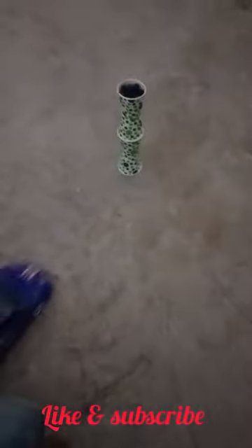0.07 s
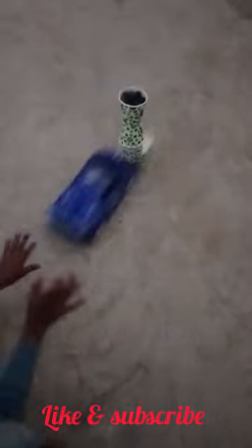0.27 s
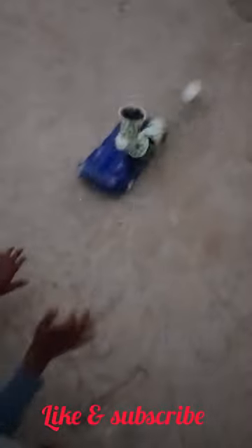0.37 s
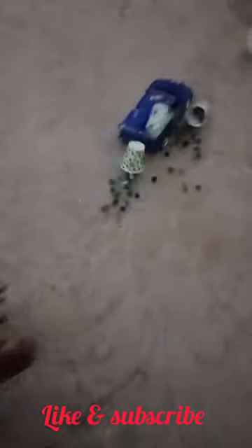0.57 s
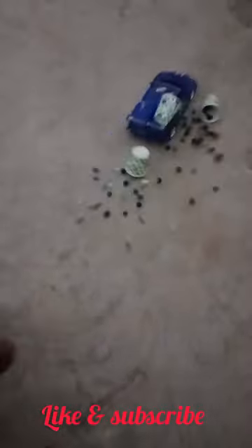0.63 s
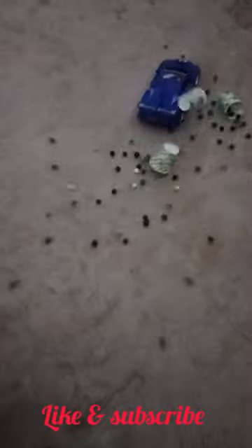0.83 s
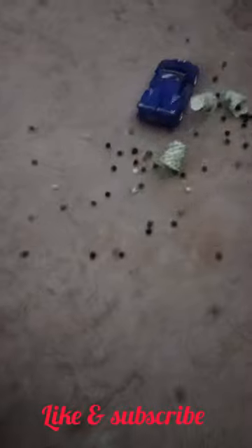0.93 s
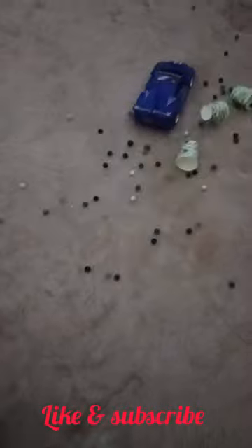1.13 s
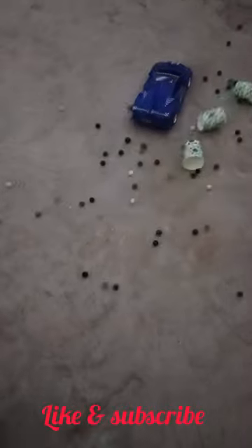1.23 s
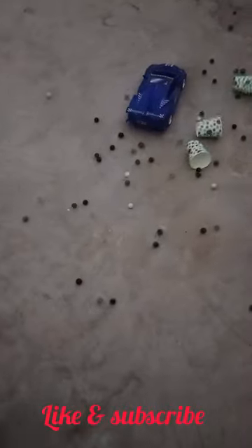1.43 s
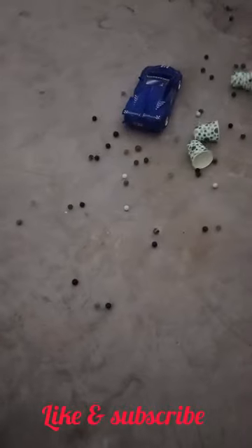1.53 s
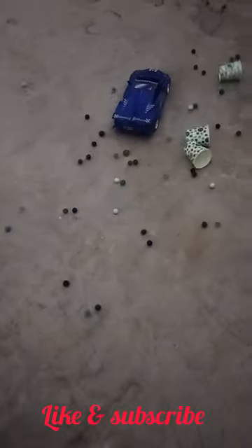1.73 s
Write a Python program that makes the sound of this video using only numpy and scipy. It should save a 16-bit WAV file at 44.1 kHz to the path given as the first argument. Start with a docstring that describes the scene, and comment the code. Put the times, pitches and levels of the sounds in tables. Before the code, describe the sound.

Crunching crash of a plastic toy car toppling paper cups, then marbles clicking and rolling apart.

```python
"""Toy car and cups of marbles

A plastic toy car, shoved across a hard floor, rams a stack of paper cups filled with marbles.
Bumps excite the modes of its shell, and the crash is a dense train of impacts. The cups tumble and
bounce with hollow pops as their walls and enclosed air resonate. The marbles pour over the car, then
click and roll apart. A phone above the floor hears it in a bare room."""
import sys
import numpy as np
from scipy import signal
from scipy.fft import rfft, irfft, next_fast_len
from scipy.io import wavfile
from scipy.ndimage import uniform_filter1d

SR = 44100
rng = np.random.default_rng(int(sys.argv[2]) if len(sys.argv) > 2 else 0)


def put_to_file(sound):
    """Save the sound as 16-bit audio at rate SR, in the file named by the first command-line argument."""
    columns = np.atleast_2d(sound).T  # one column per channel
    safe = np.clip(columns, -1, 1)
    whole_steps = np.round(safe * 32767)
    wavfile.write(sys.argv[1], SR, whole_steps.astype(np.int16))


N = 79380

# Loudness curves of the continuous sounds. Each row: time in seconds, level in dB.
ROLL_LEVELS = [(.5, -66), (.8, -35), (1.5, -38), (1.8, -40.5)]
SCATTER_LEVELS = [(.34, -38), (.355, -24), (.42, -36.5), (.53, -34.5), (.66, -30), (.92, -43.5),
                  (1.005, -57), (1.03, -34.5), (1.8, -40)]
SCRAPE_LEVELS = [(.53, -23.5), (.59, -26.5), (.70, -25), (.9, -33.5), (1.12, -40.5), (1.3, -80)]
WHEEL_LEVELS = [(0, -67.5), (.09, -60.5), (.16, -36), (.22, -22.5), (.29, -26.5), (.325, -39), (.45, -28),
                (.56, -32), (1.0, -55)]
# Spectral shapes. Each row: frequency in Hz, relative gain in dB.
ROLL_SPECTRUM = [(40, -17), (130, -9.5), (330, -3), (620, -1), (1500, -6), (5500, -9.5), (8200, -20.5),
                 (12000, -70)]
SCATTER_SPECTRUM = [(300, -45), (1200, 2), (2800, -1.5), (4500, 0), (7500, 1), (9000, -6), (12000, 6.5)]
SCRAPE_SPECTRUM = [(200, -25), (440, -9.5), (550, -0.5), (720, -11.5), (1100, 1.5), (1600, -30),
                   (6000, -19)]
WHEEL_SPECTRUM = [(40, -34), (120, -31), (260, -11.5), (420, -9.5), (540, -5.5), (760, -12), (1050, -24),
                  (5000, -33.5), (12000, -52.5)]
CRUNCH_SPECTRUM = [(50, -47), (125, -33.5), (247, -16.5), (332, -18.5), (524, -4), (705, -14), (886, -8),
                   (1430, -16), (4580, -25), (7220, -24.5), (14000, -36)]
MIC_RESPONSE = [(30, -11), (130, 1), (7500, 0), (9000, -2.5), (10000, -12), (12000, -22), (14500, -28),
                (16000, -55)]
ECHO_SPECTRUM = [(500, -8), (3000, 2.5)]
PAPER_SPECTRUM = [(200, -8), (600, -7), (1200, 2), (2000, -4), (8000, -34)]
# Hollow knocks: wheel bumps, crash hits on the shell, then a cup's soft thud on the floor.
# Each row: start in seconds, peak in dB.
HOLLOW_KNOCKS = [(0.144, -27.5), (0.174, -21), (.208, -24), (.223, -14), (.263, -4.5), (.293, -13),
                 (.340, -18), (.414, -12.5), (0.464, -7.5), (.477, -11), (0.985, -20)]
# Modes of the car's shell. Each row: frequency in Hz, relative level in dB, T60 in seconds.
SHELL_MODES = [(530, 9.5, 0.024), (608, 7, 0.02), (930, -0.5, 0.015), (1275, -3, 0.021),
               (2193, -3.5, 0.017)]
# Modes of the car's thin plastic panels. Each entry: frequency in Hz.
PANEL_MODES = [1260, 1780, 2400, 3770, 5030]
# Blows between car, cups and massed marbles. Each row: start in seconds, level in dB, hold in seconds.
CRUNCH_BLOWS = [(0.263, -26, 0.0081), (0.342, -18.5, 0.023), (0.388, -16.5, 0.018), (0.433, -19, 0.02),
                (0.457, -19, 0.013), (0.476, -18, 0.026), (0.512, -13.5, 0.012), (0.535, -18, 0.0091),
                (0.581, -21.5, 0.012), (0.619, -30, 0.0056), (0.842, -26.5, 0.0043), (1.683, -26, 0.0032)]
# Cups bouncing. Each row: start in seconds, wall and air levels in dB, wall and air frequencies in Hz.
CUP_BOUNCES = [(0.6208, -5, -19.5, 1244, 607), (0.696, -13.5, -50, 1101, 500),
               (.794, -10.5, -19.5, 936, 758), (.844, -17.5, -17, 827, 522), (.920, -21, -23.5, 943, 567),
               (.977, -16, -25.5, 1075, 625), (1.013, -13, -18, 1180, 622), (1.274, -11, -21.5, 1106, 562),
               (1.366, -15.5, -20, 1252, 613), (1.395, -18, -23.5, 1116, 566), (1.471, -27, -26, 1140, 571),
               (1.501, -27, -24, 1304, 648)]
# Marbles striking the floor. Each row: start in seconds, relative level in dB, ring frequency in Hz.
MARBLE_BOUNCES = [(0.393, -2.5, 3800), (0.571, -7, 7270), (.600, -12.5, 6860), (.612, -16, 6860),
                  (0.622, -12.5, 4860), (0.745, -11.5, 6560), (.779, -15, 4930), (.847, -17.5, 6000),
                  (0.942, -19, 5900), (0.9543, -13, 7300), (.963, -10.5, 4800), (.968, -10, 5170),
                  (1.0134, -10, 5500), (1.0281, -16, 4600), (1.0405, -18, 4930), (1.083, -19, 6800),
                  (1.117, -13, 6550), (1.155, -16.5, 4570), (1.195, -18.5, 7500), (1.2088, -10.5, 4640),
                  (1.299, -15.5, 4540), (1.309, -14, 4540), (1.335, -16, 4450), (1.376, -14, 4400),
                  (1.41, -16, 4560), (1.441, -13, 4300), (1.460, -8.5, 6000), (1.537, -16.5, 5830),
                  (1.577, -15, 4780), (1.665, -13.5, 5150), (1.681, -13.5, 4670), (1.725, -12.5, 5800),
                  (1.762, -21.5, 5250)]
# Marbles striking each other. Each row: start in seconds, relative level in dB, ring frequency in Hz.
MARBLE_COLLISIONS = [(.643, -5.5, 6750), (.647, -8, 6670), (0.6555, -7, 4420), (.655, -17, 6200),
                     (0.6602, -6.5, 7200), (0.6674, 0, 3980), (0.6775, -9, 5200), (0.68, -2, 4430),
                     (0.6962, -10.5, 5000)]


def undb(db):
    """Amplitude grows tenfold for every 20 dB."""
    return 10 ** (np.asarray(db) / 20)


def unit(x):
    """Normalisation to an rms of 1."""
    return x / np.sqrt(np.mean(x ** 2) + 1e-18)


def envelope(points):
    """Gain interpolated in dB through (seconds, dB) points, silent before the first."""
    return undb(np.interp(np.arange(N) / SR, *np.array(points).T, left=-np.inf))


def decay(t, t60):
    """Exponential damping, by 60 dB in t60 seconds."""
    return np.exp(-np.log(1000) * t / t60)


def butterworth(x, order, hz, kind):
    """A filter with a maximally flat passband."""
    return signal.sosfilt(signal.butter(order, hz, kind, fs=SR, output="sos"), x)


def colour(x, points):
    """Minimum-phase filtering through (Hz, dB) points: folding the cepstrum makes it causal."""
    size = 2 * next_fast_len(N)
    hz, db = np.array(points).T
    bin_hz = np.arange(size // 2 + 1) * SR / size
    gain = undb(np.interp(np.log(bin_hz + 1), np.log(hz), db))
    cepstrum = irfft(np.log(gain))
    cepstrum[1:size // 2] *= 2
    cepstrum[size // 2 + 1:] = 0
    return irfft(rfft(x, size) * np.exp(rfft(cepstrum)))[..., :N]


def add(out, start, sound):
    """Superposition of a sound from a start in seconds."""
    i = int(np.clip(start * SR, 0, N - 1))
    out[..., i:i + sound.shape[-1]] += sound[..., :N - i]


def spread(pair, wide_hz):
    """Coherence falls with frequency: left and right are alike in the bass, unrelated in the treble."""
    side = butterworth(pair[1], 1, wide_hz, "high")
    return np.array([pair[0] + side, pair[0] - side])


def since_arrival(t, lag):
    """A path difference delays one channel: seconds since the sound reached each microphone."""
    return np.maximum(t - np.maximum([[lag], [-lag]], 0), 0)


def grit(per_s, spread_db):
    """Two Poisson streams of tiny impacts, random in sign and strength."""
    hits = rng.random((2, N)) < per_s / SR
    signs = np.sign(rng.standard_normal((2, N)))
    return hits * signs * undb(spread_db * np.clip(rng.standard_normal((2, N)), -2, 2))


def soften(x, start):
    """Contact time limits bandwidth: later bounces are slower, so they touch longer and sound duller."""
    bright_hz, dulling_hz_per_s = 15060, 4930
    return butterworth(x, 4, bright_hz - dulling_hz_per_s * start, "low")


def room(x):
    """Reverberation: early reflections from near walls, then a diffuse tail whose treble dies first."""
    t = np.arange(N) / SR
    noise = spread(rng.standard_normal((2, N)), wide_hz=990)
    low = butterworth(noise, 1, 3000, "low")
    build_up = np.clip((t - .004) / .0028, 0, 1)
    tail = (low * decay(t, t60=.65) + (noise - low) * decay(t, t60=.19)) * build_up
    reflections = grit(per_s=1100, spread_db=2.5) * (t > .003) * np.exp(-t / .0064)
    echoes = colour(reflections, ECHO_SPECTRUM)
    response = (undb(-12.5) * unit(tail) + undb(-8.5) * unit(echoes)) / np.sqrt(N)
    return x + signal.fftconvolve(x, response, axes=1)[:, :N]


def marble_roll():
    """Rolling noise arises from surface roughness: marbles tick over the floor's grain."""
    grain = spread(grit(per_s=2000, spread_db=2.5), wide_hz=1500)
    return unit(colour(grain, ROLL_SPECTRUM)) * envelope(ROLL_LEVELS)


def marble_scatter():
    """Weak bounces are heavily damped oscillations, each a dry tick with its own pitch and place."""
    t = np.arange(SR // 150) / SR
    ticks_per_s, level_range_db, lag_spread_s = 260, 11, 7.95e-5
    out = np.zeros((2, N))
    for k, (jitter, strength, pitch, place) in enumerate(rng.standard_normal((N // 100, 4))):
        start = SCATTER_LEVELS[0][0] + abs(k + jitter) / ticks_per_s
        if start < N / SR:
            age = since_arrival(t, lag_spread_s * place)
            hz = 4900 * np.exp(.7 * np.tanh(pitch))
            ping = np.sin(2 * np.pi * hz * age) * decay(age, t60=.002)
            noise = .21 * rng.standard_normal(age.shape) * decay(t, t60=.0053)
            add(out, start, undb(level_range_db * np.tanh(strength / 2)) * soften(ping + noise, start))
    return unit(colour(out, SCATTER_SPECTRUM)) * envelope(SCATTER_LEVELS)


def cup_scrape():
    """Friction of rims dragging over floor and marbles excites both resonances of the cups."""
    friction = spread(grit(per_s=700, spread_db=3), wide_hz=2500)
    return unit(colour(friction, SCRAPE_SPECTRUM)) * envelope(SCRAPE_LEVELS)


def marble_clicks():
    """Hard contact of glass on stone gives a snap, a ping of a few cycles and a brief chatter."""
    t = np.arange(SR // 40) / SR
    lag_spread_s, attack_s = .00005, .00021
    out = np.zeros((2, N))
    for start, db, hz in MARBLE_BOUNCES:
        age = since_arrival(t, lag_spread_s * rng.standard_normal())
        cycles = hz * age
        snap = np.sin(2 * np.pi * cycles) * np.exp(-(2 * (cycles - 1)) ** 2)
        attack = 1 - np.exp(-age / attack_s)
        ping = np.sin(2 * np.pi * (cycles + rng.random())) * decay(age, t60=.0038) * attack
        noise = butterworth(rng.standard_normal((2, len(t))), 2, [.6 * hz, 1.45 * hz], "band")
        chatter = unit(noise) * decay(t, t60=.014)
        click = undb(1) * snap + ping + undb(-8) * chatter
        add(out, start, undb(db + 2.5) * soften(click, start))
    return out


def marble_spill():
    """Elastic collisions of glass on glass crack and ping, then ring faintly through the heap."""
    t = np.arange(SR // 20) / SR
    attack, damping = 1 - np.exp(-t / .0004), decay(t, t60=.0065)
    out = np.zeros((2, N))
    for start, db, hz in MARBLE_COLLISIONS:
        ping = np.sin(2 * np.pi * (hz * t + rng.random((2, 1)))) * damping
        noise = butterworth(rng.standard_normal((2, len(t))), 2, [.9 * hz, 1.1 * hz], "band")
        heap = unit(noise) * decay(t, t60=.03)
        crack = rng.standard_normal((2, len(t))) * damping
        clack = 2 * (ping + undb(-6) * crack) + undb(-15) * heap
        add(out, start, undb(db) * clack * attack)
    return butterworth(out, 4, 3300, "high")


def cup_bounces():
    """A rim's slap excites the resonances of enclosed air and paper wall, about an octave apart."""
    t = np.arange(SR // 5) / SR
    first_buzz_hz, emptying_s, phase_spread_rad = 28, .35, .4
    attack = 1 - np.exp(-t / .0017)
    rings, slap_force = np.zeros((2, N)), np.zeros(N)
    for start, wall_db, air_db, wall_hz, air_hz in CUP_BOUNCES:
        # Marbles buzzing inside roughen both notes, less so as the cups empty.
        buzz_hz = first_buzz_hz * np.exp((CUP_BOUNCES[0][0] - start) / emptying_s)
        wander = np.cumsum(rng.standard_normal((2, 1, len(t))), axis=2)
        wander *= np.sqrt(2 * np.pi * buzz_hz / SR)
        phase = phase_spread_rad * rng.standard_normal((2, 2, 1)) + uniform_filter1d(wander, size=64)
        air = undb(air_db) * np.sin(2 * np.pi * air_hz * t + phase[0]) * decay(t, t60=.088)
        wall = undb(wall_db) * np.sin(2 * np.pi * wall_hz * t + phase[1]) * decay(t, t60=.052)
        add(rings, start, (air + wall) * attack)
        add(slap_force, start, undb(wall_db - 12) * decay(t, t60=.048))
    noise = spread(rng.standard_normal((2, N)), wide_hz=1800)
    slaps = slap_force * unit(colour(noise, PAPER_SPECTRUM))
    return butterworth(rings + slaps, 2, 280, "high")


def car():
    """The floor's grain rattles the wheels; knocks ring the shell's modes, which also voice a cup's thud."""
    t = np.arange(SR // 8) / SR
    attack = 1 - np.exp(-t / .0038)
    modes = sum(undb(db) * np.sin(2 * np.pi * hz * t) * decay(t, t60) for hz, db, t60 in SHELL_MODES)
    knock = butterworth(modes * attack, 2, 230, "high")
    grain = spread(grit(per_s=900, spread_db=3), wide_hz=2800)
    out = unit(colour(grain, WHEEL_SPECTRUM)) * envelope(WHEEL_LEVELS)
    for start, db in HOLLOW_KNOCKS:
        add(out, start, undb(db) * knock / abs(knock).max())
    return out


def crunch_force():
    """The force of each blow holds, then relaxes exponentially."""
    t = np.arange(SR // 8) / SR
    release_s = .0067
    force = np.zeros(N)
    for start, db, hold_s in CRUNCH_BLOWS:
        add(force, start, undb(db) * np.exp(-np.maximum(t - hold_s, 0) / release_s))
    return force


def panel_rattle():
    """Impulse excitation: in each crunch hard hits ring the panels, each with its own mix of modes."""
    t = np.arange(SR // 30) / SR
    hits_per_s, spread_db, fall_db_per_s = 280, 3.8, 25
    hits = (rng.random(N) < hits_per_s / SR) * undb(spread_db * np.clip(rng.standard_normal(N), -2, 2))
    out = np.zeros((2, N))
    for hz in PANEL_MODES:
        ring = np.sin(2 * np.pi * hz * t) * decay(t, t60=.016)
        out += signal.fftconvolve(hits * rng.uniform(-.96, 1, (2, N)), ring[None], axes=1)[:, :N]
    from_impact_s = abs(np.arange(N) / SR - CRUNCH_BLOWS[1][0])
    return unit(out) * crunch_force() * undb(-8.5 - fall_db_per_s * from_impact_s)


def crash():
    """Shot noise: each blow is a tight cluster of impacts on paper and plastic, heard as a crunch."""
    impacts = spread(grit(per_s=2600, spread_db=4), wide_hz=2600)
    return colour(impacts * crunch_force(), CRUNCH_SPECTRUM) / colour(impacts, CRUNCH_SPECTRUM).std()


def scene():
    """The sources superpose in the room; the marbles drift left, and the left channel lags slightly."""
    drift_db_per_s, left_lag_s = 1.04, .00012
    pan = undb(np.array([[1], [-1]]) * drift_db_per_s * np.arange(N) / SR / 2)
    marbles = marble_spill() + marble_clicks() + marble_scatter() + marble_roll()
    left, right = car() + crash() + panel_rattle() + cup_bounces() + cup_scrape() + pan * marbles
    late_left = np.pad(left, (round(left_lag_s * SR), 0))[:N]
    return room(np.array([late_left, right]))


def record(dry):
    """A soft limiter rounds the loudest peaks; band limiting dulls and cuts the top treble."""
    ceiling, top_hz = .88, 15800
    rounded = dry / (1 + (dry / ceiling) ** 6) ** (1 / 6)
    low_pass = signal.ellip(8, .2, 70, top_hz, fs=SR, output="sos")
    return signal.sosfilt(low_pass, colour(rounded, MIC_RESPONSE))


dry = scene()
out = record(dry)
put_to_file(out)
```